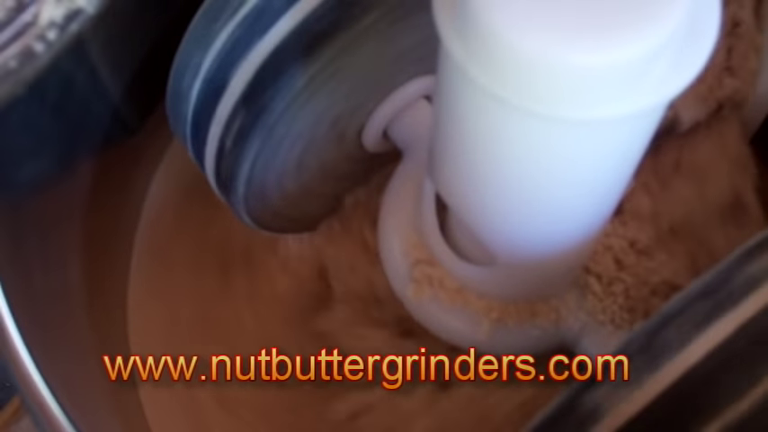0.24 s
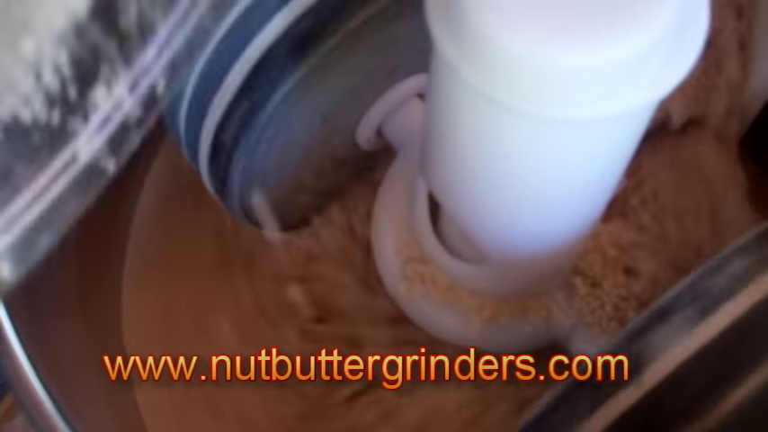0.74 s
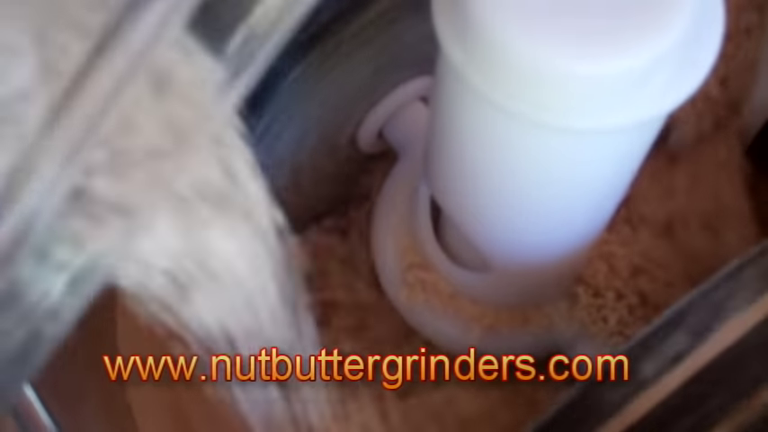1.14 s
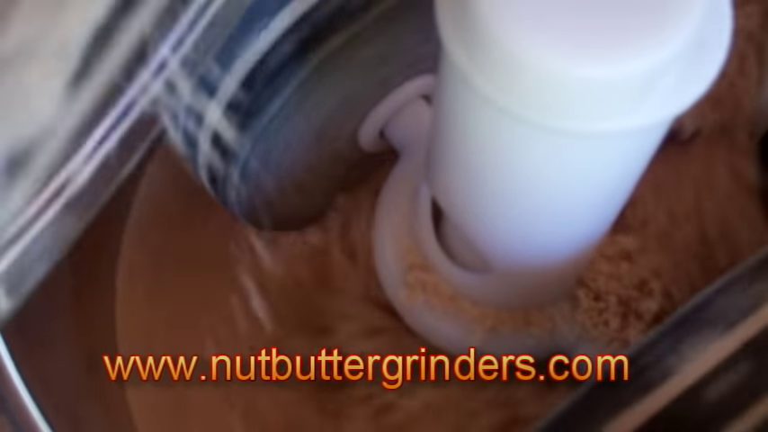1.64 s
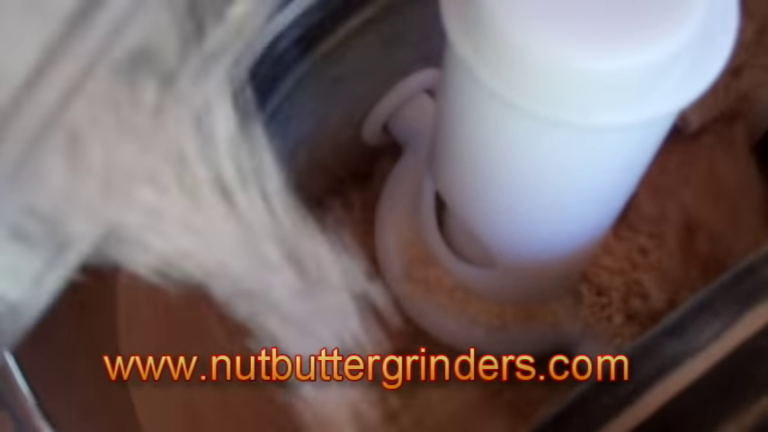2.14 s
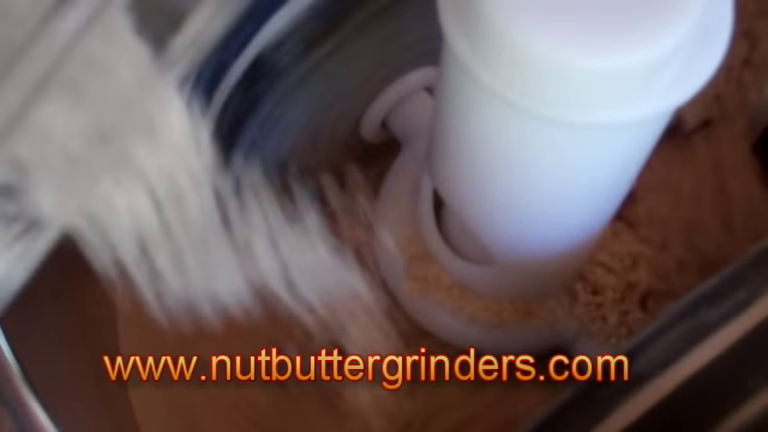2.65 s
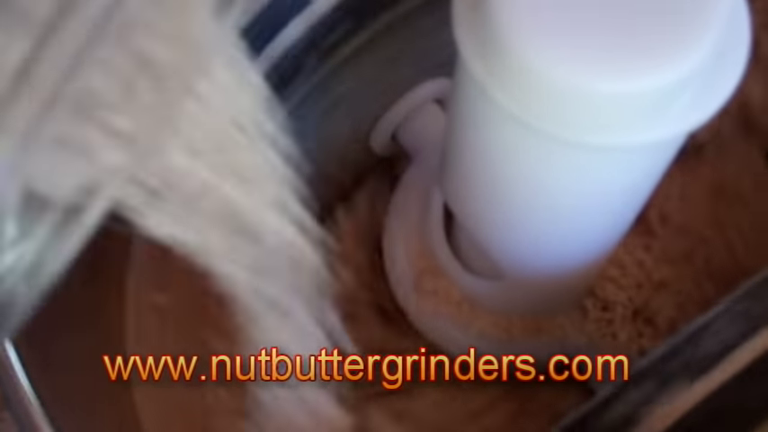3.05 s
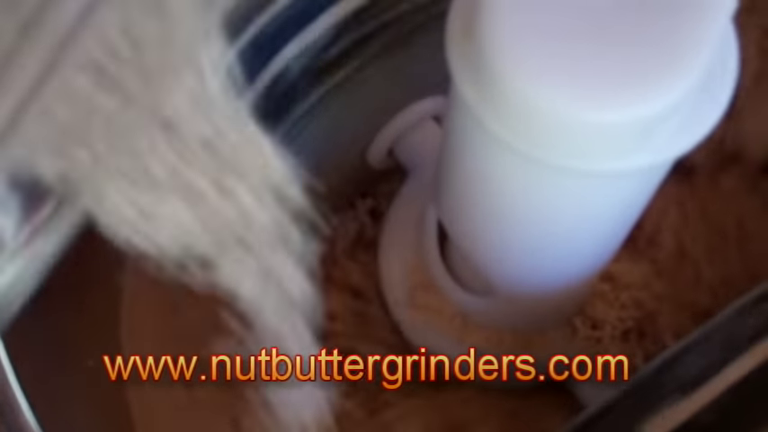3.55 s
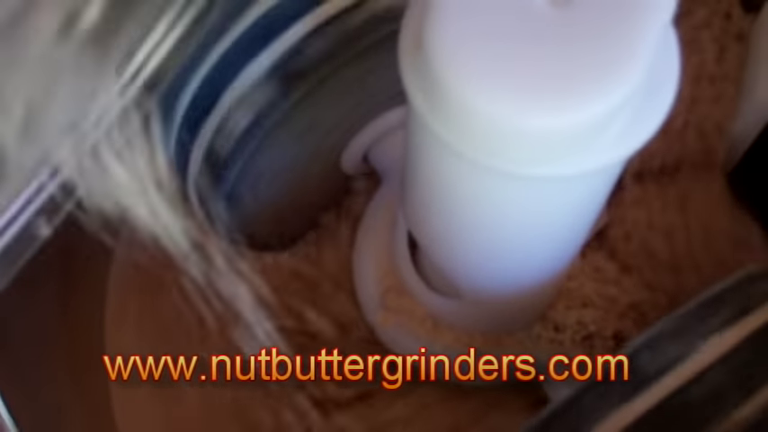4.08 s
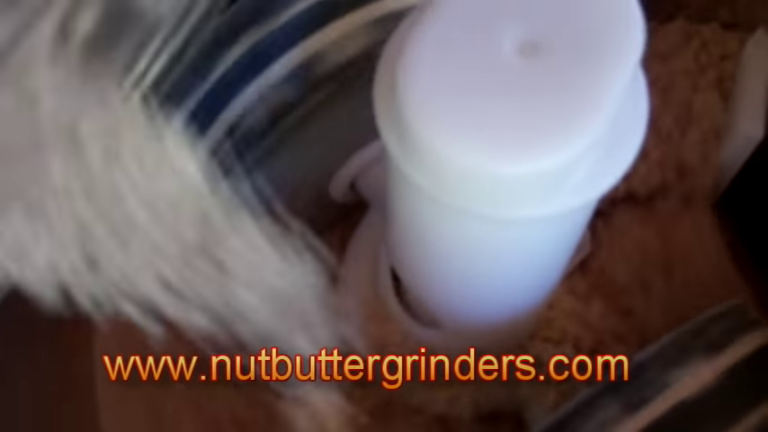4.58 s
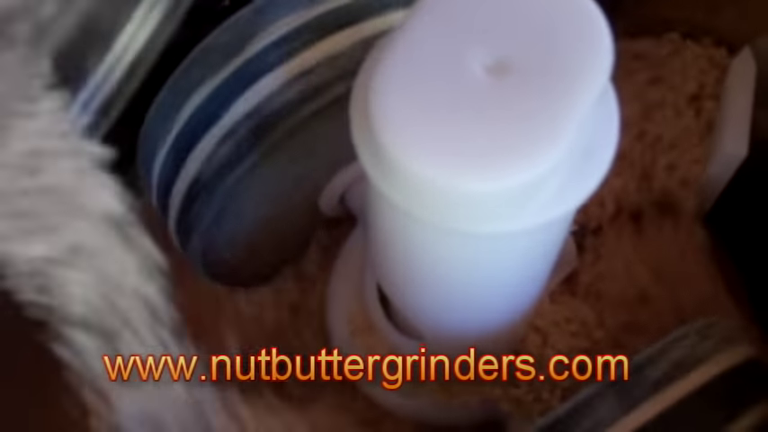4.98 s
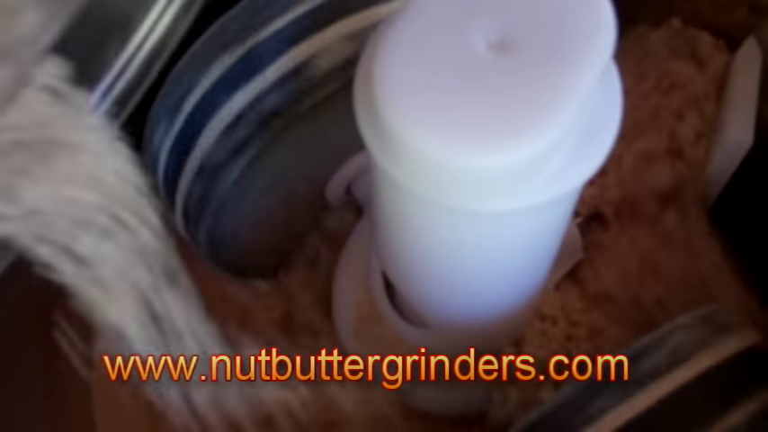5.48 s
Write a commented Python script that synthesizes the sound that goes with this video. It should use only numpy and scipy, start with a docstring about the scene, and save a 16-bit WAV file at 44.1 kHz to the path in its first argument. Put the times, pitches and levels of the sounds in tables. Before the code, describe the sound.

A tabletop electric grinder is already running, close to the microphone in a kitchen, and continues for the whole of nearly six seconds. The main sound is a strong, slightly fluttering hum over a low motor drone and the rumble of stone rollers in a steel drum. A thin whine rides above, sagging under load about twice a second. Beneath it, wet paste squelches and hisses softly, with a fine gritty crunch. Seeds break with small, irregular cracks, light knocks and metallic ticks, clearest around 0.6, 1.0, 1.5 and 1.9 seconds. From about 3 seconds the paste thickens: the hum sinks slightly in pitch, the pulsing evens out and the whine fades, nearly gone by 4.8 seconds. Lumps briefly rub the drum near 3.5 and 4 seconds. A tiny brittle snap comes at 4.5 seconds and a sharper steely crack just before 5, as the grinding carries on.

```python
"""Kitchen, close to a tabletop wet grinder working flakes into a thickening paste.
The drive train judders with a strong hum; the motor whines and sags under load about twice a second.
Stone rollers rumble through the wet paste, which squelches and hisses at each bite.
Crumbs, seeds and flakes crack under the stones; the rollers knock and the steel drum rings."""
import sys
import numpy as np
from scipy import signal
from scipy.fft import rfft, irfft, next_fast_len
from scipy.io import wavfile

SR = 44100
rng = np.random.default_rng(int(sys.argv[2]) if len(sys.argv) > 2 else 0)


def store_wav(level_fs):
    """Save 16-bit WAV to argv[1]."""
    pcm = np.round(np.clip(np.atleast_2d(level_fs), -1, 1) * 32767)
    wavfile.write(sys.argv[1], SR, pcm.T.astype(np.int16))


N = 252235
T = np.arange(N) / SR
FFT_SIZE = next_fast_len(N, True)
FREQS = np.maximum(np.fft.rfftfreq(FFT_SIZE, 1 / SR), 1)

# paste thickness: t/s, share/0-1
THICKNESS = [(0, 0.08), (3.1, 0.34), (3.5, 0.75), (4.4, 0.68), (4.9, 1), (5.7, 1)]
# stone resonances: f/Hz, width/Hz, level/dB
STONE_MODES = [(1775, 450, 3.5), (2002, 500, 1.6), (2507, 60, 1.6), (2723, 310, 3.8)]
# steel drum resonances: f/Hz, width/Hz, level/dB
STEEL_MODES = [(6650, 510, -3.5), (7600, 470, -0.5), (7780, 410, 3), (8150, 390, 0.5)]


def undb(db):
    """Decibels to gain."""
    return 10 ** (np.asarray(db) / 20)


def unit(x):
    """Scale to rms 1."""
    return x / np.sqrt(np.mean(x ** 2))


def over_time(points):
    """Interpolate (t/s, value) points per sample."""
    return np.interp(T, *np.transpose(points))


def over_hz(points):
    """Interpolate (f/Hz, value) points in log frequency."""
    hz, value = np.transpose(points)
    return np.interp(np.log(FREQS), np.log(hz), value)


def filtered(x, response):
    """Apply a frequency response."""
    return irfft(rfft(x, FFT_SIZE) * response, FFT_SIZE)[..., :N]


def colour(x, points):
    """Equalise by (f/Hz, level/dB) points."""
    return filtered(x, undb(over_hz(points)))


def resonate(x, modes):
    """Steep resonances in parallel."""
    response = sum(undb(db) / (1 + 1j * hz / width * (FREQS / hz - hz / FREQS)) ** 2
                   for hz, width, db in modes)
    return filtered(x, response)


def walk(rate_hz):
    """Smooth random drift, rms 1."""
    return unit(filtered(rng.standard_normal(N), 1 / (1 + (FREQS / rate_hz) ** 4)))


def stereo_noise():
    """White noise, alike in both channels in the bass, wide in the treble."""
    # left-right likeness: f/Hz, correlation
    likeness = [(30, 0.96), (100, 1), (300, 0.96), (640, 0.92), (1400, 0.79), (3000, 0.5), (5000, -0.21),
                (8000, -0.34), (14000, 0.15)]
    alike = over_hz(likeness).clip(-.999, .999)
    mid, side = filtered(rng.standard_normal((2, N)), np.sqrt([(1 + alike) / 2, (1 - alike) / 2]))
    return np.array([mid + side, mid - side])


def phase_rad(hz):
    """Running phase from a random start."""
    return 2 * np.pi * (np.cumsum(hz) / SR + rng.random())


def strikes(times_s, sizes):
    """Impulse train."""
    return np.bincount(np.clip(times_s * SR, 0, N - 1).astype(int), sizes, N)[None]


def scatter(count, spread_db):
    """Impulses at random times: many small, few large."""
    when, size = rng.random((count, 2)).T
    return strikes(when * N / SR, undb(-spread_db * np.log(size + 0.0035)))


def burst(train, t60_s):
    """Each impulse becomes a short spray of fractures, different per channel."""
    t = T[:SR // 8]
    spray = rng.standard_normal((2, len(t))) * np.exp(-np.log(1000) * t / t60_s)
    return signal.fftconvolve(train, spray, axes=1)[:, :N]


def ring(train, modes):
    """Each impulse rings decaying modes."""
    t = T[:SR // 8]
    tone = sum(undb(db) * np.sin(2 * np.pi * hz * t) * np.exp(-np.log(1000) * t / t60_s)
               for hz, db, t60_s in modes)
    return signal.fftconvolve(train, tone[None], axes=1)[:, :N]


def swing(lag_s=0, turn_s=0.468, first_light_s=0.3084):
    """The load eases (positive) once per drum turn; thick paste evens this out."""
    depth = 1 - 0.9 * over_time(THICKNESS)
    return depth * np.cos(2 * np.pi * (T - first_light_s - lag_s) / turn_s)


def loaded(thin, thickening, per_turn, lag_s=0):
    """Load-dependent value: base in thin paste, shift with thickness, swing per turn."""
    return thin + thickening * over_time(THICKNESS) + per_turn * swing(lag_s)


def crumbs(bite_lag_s, grit_db=-52, tick_db=-53, crunch_db=-49, bite_db=2):
    """Crumbs burst under the stones, louder at each bite; some tick the steel, some crunch dully."""
    # grit spectrum: f/Hz, level/dB
    grit_eq = [(500, -21), (2000, 23), (4000, 8.5), (6500, 27), (8000, 26), (9500, 20.5), (13500, 14)]
    grit = colour(burst(scatter(count=800, spread_db=1.5), t60_s=0.012), grit_eq)
    ticks = sum(resonate(burst(scatter(count=45, spread_db=3), t60_s=0.027), [mode])
                for mode in STEEL_MODES)
    crunch = resonate(burst(scatter(count=260, spread_db=3), t60_s=0.024), STONE_MODES)
    grit_gain = undb(grit_db + bite_db * swing(bite_lag_s))
    crunch_gain = undb(loaded(crunch_db, -8, bite_db, bite_lag_s))
    return grit_gain * unit(grit) + undb(tick_db) * unit(ticks) + crunch_gain * unit(crunch)


def cracks(crack_db=-3, tail_db=-13, knock_db=21, holder_db=6, steel_db=13):
    """Seeds give way with a crack; the roller drops back with a knock and the steel rings."""
    # seed breaks, relative levels: t/s, crack/dB, knock/dB, steel/dB
    seeds = [(0.061, -30, -45, -32), (0.1115, -26, -42, -44), (0.1755, -37, -41, -53),
             (0.2848, -31, -55, -31), (0.372, -35, -41, -37), (0.4392, -35, -43.5, -42),
             (0.5611, -20, -46, -37.5), (0.941, -37, -43, -45), (1.0136, -22, -44, -47),
             (1.273, -33, -51, -32.5), (1.4047, -30, -51, -32), (1.465, -23, -40, -45),
             (1.916, -22, -41, -32), (2.192, -28, -47.5, -30), (2.369, -26.5, -41, -49),
             (2.7226, -27, -40, -39), (2.821, -24, -46, -38), (3.282, -29, -45, -50),
             (3.7404, -36, -45, -45), (4.0868, -31, -58, -38), (4.2041, -24.5, -43.5, -38),
             (4.559, -33, -57, -33), (4.6672, -33, -42.5, -44), (4.9379, -20.5, -54, -22.5),
             (4.99, -24, -45, -29), (5.1352, -27, -43, -36), (5.603, -25, -45.5, -32.5)]
    # crack spectrum: f/Hz, level/dB
    crack_eq = [(500, -22), (2000, -11), (4000, 1.5), (7000, -6), (10000, 4), (11500, 8), (14000, 9)]
    # dull roller clack: f/Hz, width/Hz, level/dB
    clack_modes = [(2750, 1700, -0.5), (1750, 600, -5), (5000, 2000, -10)]
    # rollers knocking in their holder: f/Hz, level/dB, t60/s
    holder_modes = [(2474, -2, 0.064), (5510, -7, .025)]
    times_s, *levels_db = np.transpose(seeds)
    breaks, knocks, steel_hits = (strikes(times_s, undb(db)) for db in levels_db)
    spray = burst(breaks, t60_s=0.0064) + undb(tail_db) * burst(breaks, t60_s=0.077)
    clack = undb(knock_db) * resonate(burst(knocks, t60_s=0.022), clack_modes)
    holder = undb(holder_db) * ring(knocks, holder_modes)
    steel = undb(steel_db) * resonate(burst(steel_hits, t60_s=0.028), STEEL_MODES)
    return undb(crack_db) * colour(spray, crack_eq) + clack + holder + steel


def snaps(gain_db=-5):
    """Brittle flakes snap in the high treble."""
    # flake breaks: t/s, relative level/dB
    flakes = [(4.508, -1), (4.518, -13), (4.938, -23)]
    # snap spectrum: f/Hz, level/dB
    snap_eq = [(1000, -29), (6000, -28), (8500, -10), (12500, -2), (14000, -1)]
    times_s, db = np.transpose(flakes)
    return undb(gain_db) * colour(burst(strikes(times_s, undb(db)), t60_s=0.01), snap_eq)


def squeeze(judder_hz, bite_lag_s, scrape_db=-5.5, sing_db=-7, paste_db=4.5, bite_db=0.76):
    """The stones scrape and sing as they press the paste, which squelches and hisses at each bite."""
    # squelch envelope: t/s, level/dB
    squelch_db = [(0, -43), (1.2, -44), (3.3, -44.5), (4.5, -45.3), (5.4, -44)]
    # singing stone: f/Hz, width/Hz, level/dB
    sing_mode = [(3338, 93, 0)]
    # wet paste spectrum: f/Hz, level/dB
    paste_eq = [(30, -3.5), (80, 7.5), (300, 6.5), (1000, 2), (1450, -2), (3600, 1.5), (5200, 0.7),
                (7000, -0.5), (8000, 3.5), (9000, 0.5), (11000, -2), (13500, -3.5)]
    # fine hiss spectrum: f/Hz, level/dB
    hiss_eq = [(3000, -26), (8000, -11), (11000, -0.5), (13000, 6.5)]
    throb = 1 + 0.034 * np.sin(phase_rad(judder_hz / 3))
    pressure = undb(1.3 * walk(19) + walk(130)) * throb
    scrape = undb(scrape_db) * unit(resonate(stereo_noise() * pressure, STONE_MODES))
    sing_gain = undb(loaded(sing_db, -1.5, 1.5) + 1.84 * walk(17))
    sing = sing_gain * unit(resonate(stereo_noise(), sing_mode))
    paste = undb(paste_db) * unit(colour(stereo_noise() * pressure, paste_eq))
    hiss = unit(colour(stereo_noise() * pressure, hiss_eq))
    squelch_gain = undb(over_time(squelch_db) + bite_db * swing(bite_lag_s))
    hiss_gain = undb(loaded(-42, -2, 4.5, bite_lag_s))
    return squelch_gain * (scrape + sing + paste) + hiss_gain * hiss


def rollers(wall_db=-41.5, thin_db=-45, thick_db=-52):
    """Rolling stones shake housing and drum; the wall's ring moves to a lower mode as paste thickens."""
    # housing resonances: f/Hz, width/Hz, level/dB
    housing_modes = [(140.8, 32, -8.5), (238.5, 18, -10), (377.3, 49.6, -1.5), (475.3, 29.5, -8)]
    # drum wall resonances: f/Hz, width/Hz, level/dB
    wall_modes = [(558, 326, -1), (663, 20, -8), (870, 148, -3.5)]
    thin_modes, thick_modes = [(1100, 64, 2.5), (1276, 63, -5)], [(794, 47, 0)]
    # lumps of flakes rubbing the wall: t/s, rise/dB, length/s
    rubs = [(3.472, 10, 0.033), (4.03, 11, 0.013)]
    thickness = over_time(THICKNESS)
    rub_db = sum(db * np.exp(-((T - at_s) / length_s) ** 2) for at_s, db, length_s in rubs)
    housing = undb(loaded(-31, -3, 2.6)) * unit(resonate(stereo_noise(), housing_modes))
    wall = undb(wall_db) * unit(resonate(stereo_noise(), wall_modes))
    wall += undb(thin_db - 6 * thickness) * unit(resonate(stereo_noise(), thin_modes))
    wall += undb(thick_db + 8 * thickness + rub_db) * unit(resonate(stereo_noise(), thick_modes))
    return housing + wall


def motor(rough_db=1.88, whine_swing_db=2.5, hum_db=-44, mains_hz=60):
    """Shaft orders and a whine sag together under load, over a magnetic hum of fixed pitch."""
    # shaft drone: multiple of turning rate, level/dB
    orders = [(2, -33), (4, -10.5), (6, -3), (10, -13), (12, 0.5), (15, -32.5), (18, -22)]
    # whine fading as the drum fills: t/s, level/dB
    whine_db = [(0, -42.5), (2.8, -45.5), (4.3, -49.5), (4.8, -55.5), (5.7, -55.5)]
    speed = 1 + 0.0029 * walk(30.4)
    shaft_hz = loaded(38.75, -1.3, 0.34) * speed
    whine_hz = loaded(1241.2, -19, 7.7) * speed
    shaft_rad = phase_rad(shaft_hz) + 0.034 * walk(11)  # belt play
    drone = sum(undb(db + rough_db * walk(14)) * np.sin(k * shaft_rad + 2 * np.pi * rng.random())
                for k, db in orders)
    drone *= undb(loaded(-34.5, -9.5, 1.6))
    whine_gain = undb(over_time(whine_db) + whine_swing_db * swing() + 2.35 * walk(14.6))
    whine = whine_gain * np.sin(phase_rad(whine_hz))
    hum = undb(hum_db + 1.4 * walk(8)) * np.sin(2 * np.pi * 4 * mains_hz * T)
    return np.sqrt(2) * (drone + whine + hum)


def dips(count, max_depth=0.76, length_s=0.013):
    """Gain with brief dips: timed ones, plus random ones that thin out over time."""
    # main dips of the hum: t/s, depth/0-1, length/s
    timed = [(0.363, 1, 0.01), (0.742, 0.8, 0.016), (1.138, 0.9, 0.014), (1.789, 0.8, 0.014),
             (2.052, 1, 0.015), (2.178, 1, 0.013), (2.443, 0.8, 0.018), (2.994, 0.71, 0.012),
             (4.323, 0.3, 0.023), (4.551, 0.54, 0.042), (4.945, 0.7, 0.014), (5.158, 0.6, 0.013),
             (5.344, 0.6, 0.016)]
    when, size = rng.random((count, 2)).T
    times_s = (1 - np.sqrt(when)) * N / SR
    chance = [(at_s, depth, length_s) for at_s, depth in zip(times_s, max_depth * size)]
    gains = [1 - depth * np.exp(-2 * ((T - at_s) / span_s) ** 2)
             for at_s, depth, span_s in timed + chance]
    return np.prod(gains, axis=0)


def judder(hz, gain_db=-23, body_hz=335, body_width_hz=30, flutter_hz=30, rough_db=1.8):
    """The loaded drive shakes at hz / 3; its third partial meets a body resonance and hums."""
    # drive shake: harmonic number, level/dB
    partials = [(1, -13), (2, -23), (3, 1.5), (7, -31.5)]
    shake_rad = phase_rad(hz / 3) + 0.16 * walk(14.8)  # uneven grip
    dip_gain = dips(count=14)
    flutter = np.sin(phase_rad(flutter_hz + 2.3 * walk(4.6)))
    wobble = 1 + 0.096 * flutter + 0.082 * walk(96)
    resonance = 1 / np.hypot(1, 2 * (hz - body_hz) / body_width_hz)
    hum = 0
    for k, db in partials:
        gain = resonance * dip_gain * wobble if k == 3 else undb(rough_db * walk(15))
        hum += undb(db) * gain * np.sin(k * shake_rad)
    return np.sqrt(2) * undb(gain_db) * hum


def scene(judder_pan_db=0.62, motor_pan_db=-0.2, paste_pan_db=-0.5, wander_hz=1.6):
    """Judder slightly left, motor and grinding slightly right, rumble centred."""
    sides = np.array([[.5], [-.5]])
    bite_lag_s = 0.085  # stones bite the heaped paste after the lightest load
    judder_hz = loaded(346.85, -12, 3.68) + wander_hz * walk(7.7)
    drive = judder(judder_hz) * undb(judder_pan_db * sides)
    drone = motor()
    late_left = np.pad(drone, (1, 0), mode="edge")[:N]
    drone = np.array([late_left, drone]) * undb(motor_pan_db * sides)
    grinding = squeeze(judder_hz, bite_lag_s) + crumbs(bite_lag_s) + cracks() + snaps()
    return drive + drone + rollers() + grinding * undb(paste_pan_db * sides)


def record(dry):
    """Steep low-pass at 14180 Hz."""
    return signal.sosfilt(signal.ellip(14, .1, 60, 14180, fs=SR, output="sos"), dry)


dry = scene()
out = record(dry)
store_wav(out)
```